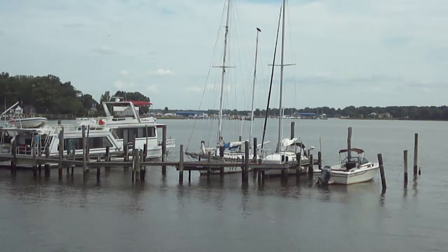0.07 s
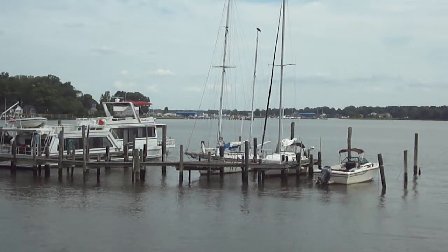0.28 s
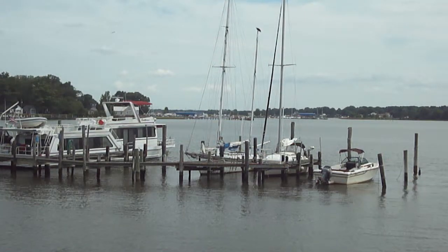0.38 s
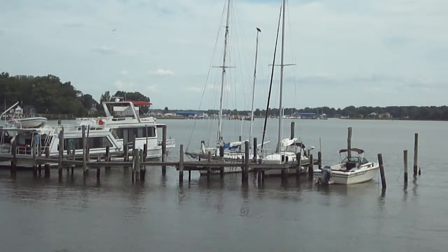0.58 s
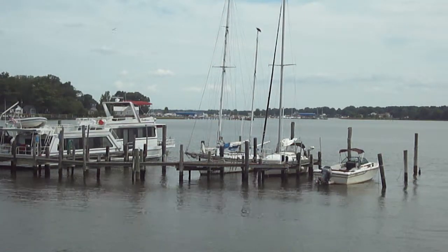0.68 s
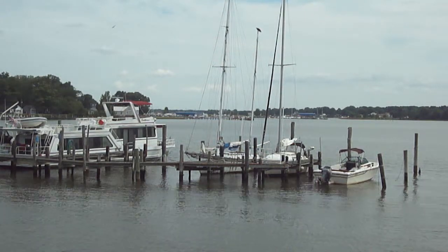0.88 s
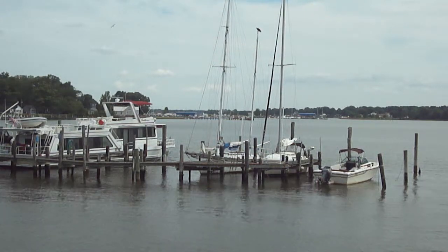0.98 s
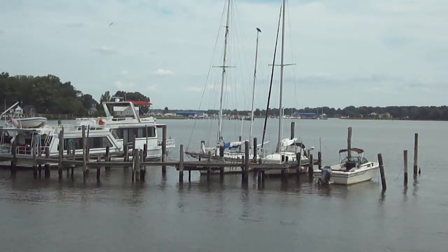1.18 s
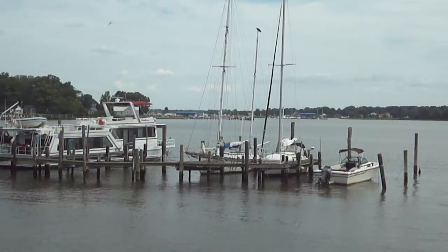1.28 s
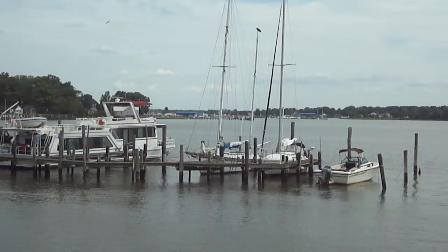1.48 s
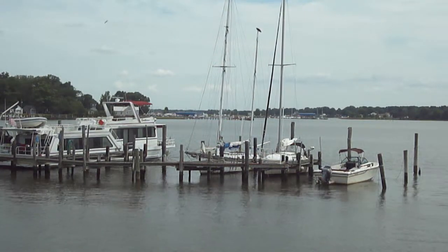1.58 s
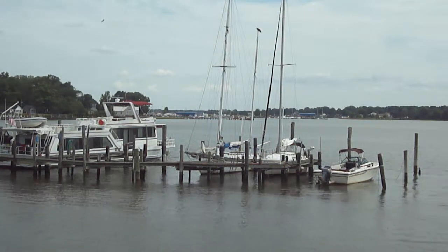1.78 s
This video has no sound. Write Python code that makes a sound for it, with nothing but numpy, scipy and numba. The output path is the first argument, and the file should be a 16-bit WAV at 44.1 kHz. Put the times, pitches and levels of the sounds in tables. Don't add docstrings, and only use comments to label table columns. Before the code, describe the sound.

Small wave at a dock piling: a sharp slap at 0.42 s, plopping, ringing bubbles and wash swelling to about 0.93, then draining to thin fizz by 1.3. A bird whistles a stepped fall at 0.2 and a higher, louder smooth fall at 1.1, echoing lightly. Cicadas buzz in quickening pulses at 0-0.5 and 1.2-1.65; faint distant birds call around 0.5 and 1.35-1.7; a mast ticks at 1.82. Quiet harbour air, thin mono microphone.

```python
import sys
import numpy as np
from scipy import signal
from scipy.io import wavfile
from scipy.ndimage import uniform_filter1d
from numba import njit

SR = 44100
rng = np.random.default_rng(int(sys.argv[2]) if len(sys.argv) > 2 else 0)


def digitize_waveform(pressure):
    field = np.atleast_2d(pressure).T
    bounded = np.clip(field, -1, 1)
    quanta = np.round(bounded * 32767).astype(np.int16)
    wavfile.write(sys.argv[1], SR, quanta)


def gain_from_db(level_db):
    decades = np.asarray(level_db, float) / 20
    return 10 ** decades


N = 81585
T = np.arange(N) / SR
BOUNCE_LAG = int(SR / 206.2)


def curve(rows, col):
    rows = np.array(rows)
    return np.interp(T, rows[:, 0], rows[:, col])


def unit(x):
    return x / np.sqrt(np.mean(x ** 2))


def tint(points, hz):
    f, db = np.array(points).T
    return np.interp(np.log(hz), np.log(f), db)


def band(x, hz, width):
    b, a = signal.iirpeak(min(hz, .45 * SR), hz / width, fs=SR)
    return signal.lfilter(b, a, signal.lfilter(b, a, x))


def highpass(x, order, hz):
    return signal.sosfilt(signal.butter(order, hz, "high", fs=SR, output="sos"), x)


def walk(rate):
    hold = int(SR / rate)
    steps = np.repeat(rng.standard_normal(N // hold + 1), hold)
    return 1.3 * uniform_filter1d(uniform_filter1d(steps, hold), hold)[:N]


def bands(points, flicker_db):
    swell = 0.5 * walk(8.35)
    total = 0
    for hz in 60 * 2 ** (np.arange(23) / 3):
        level = tint(points, hz) + 10 * np.log10(hz) + swell + flicker_db * walk(18.28)
        total = total + gain_from_db(level) * unit(band(rng.standard_normal(N), hz, hz / 2))
    return unit(total)


@njit
def ring(n, start, step, cycles, size, glide, rise):
    y = np.zeros(n)
    for k in range(len(start)):
        span = cycles[k] * 2 * np.pi / step[k]
        for i in range(min(int(span * 2), n - start[k])):
            u = i / span
            envelope = (1 - np.exp(-rise * u)) * np.exp(-3 * u)
            y[start[k] + i] += size[k] * envelope * np.sin(step[k] * i * (1 + glide * u / 2))
    return y


def bubbles(s, hz, size, cycles, glide, rise):
    return ring(N, (s * SR).astype(np.int64), 2 * np.pi * hz / SR, 1. * cycles, 1. * size, glide, rise)


# t/s, level/dB, spray/dB (gain of the top end)
WAVE_SURGE = [(0, -51, 4.5), (.3, -54.5, 15), (.4, -46, 5), (.45, -41.5, 6.5), (.55, -39.5, 1.5),
              (.6, -36, -4), (.68, -37, 0.5), (.8, -33.5, -0.5), (.93, -31, -5), (1.04, -33.5, -3),
              (1.15, -39, 2.5), (1.25, -45.5, 6), (1.4, -46, 8.5), (1.55, -46.5, 11), (1.7, -45.5, 4),
              (1.85, -47.5, -6)]
# f/Hz, level/dB per Hz
WATER_SPECTRUM = [(35, -81), (100, -62), (207, -11.5), (400, -9.5), (650, -2), (1300, -1), (4200, -4.5),
                  (10800, -22.5)]


def wash_and_fizz():
    when, pitch, luck, length = rng.random((6000, 4)).T
    hz = 400 * 2 ** (4.2 * pitch)
    scatter_db = 2 * np.minimum(-np.log(1 - luck), 4)
    size = gain_from_db(tint(WATER_SPECTRUM, hz) + 10 * np.log10(hz) + scatter_db)
    fizz = unit(bubbles(when * T[-1], hz, size, 5.68 * (.5 + length), glide=0.22, rise=15.8))
    water = gain_from_db(-0.5) * bands(WATER_SPECTRUM, flicker_db=0) + gain_from_db(-1) * fizz
    spray_hz = 3500
    low = signal.sosfiltfilt(signal.butter(1, spray_hz, fs=SR, output="sos"), water)
    spray = gain_from_db(curve(WAVE_SURGE, 2)) * (water - low)
    return gain_from_db(curve(WAVE_SURGE, 1)) * (low + spray)


def slap():
    slap_s, slap_hz, slap_db, bounce_db = .4227, 1000, -13, -10.5
    u = (T - slap_s) * slap_hz * 4
    hit = band(-gain_from_db(slap_db) * 2 * u * np.exp(-u ** 2), slap_hz, 1330)
    return hit + gain_from_db(bounce_db) * np.roll(hit, BOUNCE_LAG)


# t/s, f/Hz, peak level/dB, decay/cycles
GURGLES = [(.382, 1550, -30.5, 2.8), (.4128, 5730, -21, 8), (.4135, 2010, -34, 6), (.4155, 4120, -26.5, 12),
           (.4235, 720, -45, 4.7), (.43, 1140, -27, 7.4), (.492, 2830, -21.5, 12), (.499, 2770, -26, 7),
           (.481, 1980, -39, 4.6), (.505, 1030, -35, 10), (.493, 400, -33.5, 3.1), (.517, 1146, -27, 12.7),
           (.557, 2700, -29.5, 26), (.56, 705, -27.5, 5), (.563, 730, -24.5, 12), (.566, 1190, -24, 9),
           (.593, 1170, -25.5, 4), (.597, 586, -28.5, 4.3), (.604, 678, -29.5, 8.2), (.626, 1010, -27, 4.1),
           (.613, 603, -29, 7.9), (.643, 450, -30, 2.2), (.667, 510, -32, 3), (.640, 1370, -30, 11),
           (.654, 639, -34, 16), (.709, 2550, -30.5, 29), (.800, 855, -51, 4.1), (.879, 820, -28, 18),
           (.922, 598, -22.5, 7.9), (.940, 393, -35, 3.3), (.972, 686, -33, 5.5), (1.004, 1310, -24.5, 8.3),
           (1.065, 1180, -26.5, 9.3), (1.081, 826, -31, 9.2), (1.145, 1170, -27, 7.6),
           (1.281, 740, -41, 3.1), (1.454, 1120, -34, 9.4), (1.63, 200.6, -54, 16), (1.752, 296, -44, 5.2)]


def gurgle():
    s, hz, db, cycles = np.array(GURGLES).T
    return 3.01 * bubbles(s, hz, gain_from_db(db), cycles, glide=0.048, rise=3.67)


# t/s, level/dB, centre f/Hz, length/s
SPLASH_BURSTS = [(0.378, -39, 1960, 0.0018), (.4128, -35.5, 5840, .002), (0.4143, -29, 2040, 0.0022),
                 (0.42, -29, 4500, 0.002), (0.418, -44, 7750, 0.015), (0.487, -35, 5300, 0.0022),
                 (.492, -30, 2900, 0.0027), (0.502, -35, 8500, 0.0011), (.531, -45, 8000, .003),
                 (0.561, -32, 3100, 0.0024), (0.614, -42, 9500, 0.0035), (.659, -40, 9800, 0.0027),
                 (0.673, -39.5, 8100, 0.0034), (0.794, -41, 9000, 0.0027), (0.921, -40, 9000, .004),
                 (1.108, -39.5, 7500, 0.0017), (1.132, -54, 9500, .002), (1.31, -47, 9400, .002),
                 (1.068, -39, 7300, 0.0023)]


def splashes():
    out = np.zeros(N)
    for s, db, hz, length in SPLASH_BURSTS:
        u = np.clip((T - s) / length, 0, 40)
        burst = np.e * u * np.exp(-u * 2) * 2
        out += gain_from_db(db) * burst * unit(band(rng.standard_normal(N), hz, hz))
    return out


def wave():
    return highpass(wash_and_fizz() + slap() + gurgle() + splashes(), 3, 178)


# t/s, f/Hz, level/dB
BIRD_NOTES = [
    [(.19, 2505, -55), (.2, 2505, -29), (.215, 2450, -24.5), (.229, 2375, -21.5), (.243, 2246, -27.5),
     (.259, 2177, -22), (.275, 2136, -33), (.295, 1963, -42), (.31, 1920, -56)],
    [(1.073, 4143, -49), (1.086, 3500, -30), (1.1, 3187, -22), (1.117, 2853, -19.5), (1.135, 2623, -17),
     (1.152, 2459, -17), (1.177, 2280, -24.5), (1.192, 2175, -29), (1.212, 2030, -48)],
]
BIRD_OVERTONES = (-21, -15.5)
# delay/s, level/dB, spread/s
HULL_ECHOES = [
    (.03, -16.5, .018),
    (.075, -20, .016),
    (.12, -22.5, .016),
    (.16, -27, .02),
    (.25, -25, .04),
]


def bird():
    voice, overtone = 0, 0
    for note, overtone_db in zip(BIRD_NOTES, BIRD_OVERTONES):
        glide = uniform_filter1d(curve(note, 1), size=400)
        hz = np.roll(glide, -BOUNCE_LAG // 2) * (1 + 0.0011 * walk(120))
        phase = 2 * np.pi * np.cumsum(hz) / SR
        sounding = (T > note[0][0]) * (T < note[-1][0])
        level = gain_from_db(uniform_filter1d(curve(note, 2), size=200)) * sounding
        voice = voice + level * np.sin(phase)
        effort = (level / gain_from_db(-40)) ** .25
        overtone = overtone + gain_from_db(overtone_db) * level * effort * np.sin(2 * phase)
    overtone = band(overtone, 4600, 3000)

    harbour_t60_s, harbour_db = 1, -16.5
    tail = rng.standard_normal(N) * 10 ** (-3 * T / harbour_t60_s) * (T > .012)
    space = gain_from_db(harbour_db) * tail / np.sqrt(SR * 0.031)
    for s, db, spread in HULL_ECHOES:
        echo = rng.standard_normal(N) * np.exp(-((T - s) / spread) ** 2)
        space += gain_from_db(db) * echo / np.sqrt(SR * spread)

    bounce = np.roll(gain_from_db(-0.5) * voice + gain_from_db(-9.5) * overtone, BOUNCE_LAG)
    direct = voice + overtone
    return direct + bounce + signal.fftconvolve(direct, space)[:N]


# f/Hz, width/Hz, level/dB
TYMBAL_MODES = [(3735, 410, -3), (4275, 630, 1.5), (5170, 1390, -2), (5850, 830, -3.5), (6780, 650, -11),
                (8100, 1850, -20.5)]


def tymbal(drive):
    out = 0
    for i, (hz, width, db) in enumerate(TYMBAL_MODES):
        out = out + (-1) ** i * gain_from_db(db) * band(drive, hz, width)
    return out


# pulse number, t/s
BUZZ_PHRASES = [
    [(0, .0142), (9, .192), (16, .326), (21, .412), (28, .525)],
    [(0, 1.2118), (7, 1.3613), (9, 1.4012), (14, 1.4925), (20, 1.5888), (24, 1.6502)],
]
# t/s, buzz level/dB, chorus level/dB
CICADA_EFFORT = [(0, -39, -49), (.15, -34.5, -46), (.25, -34, -44), (.4, -35, -48), (.53, -38, -47),
                 (.8, -38, -48), (1.2, -37, -48), (1.3, -34, -47), (1.38, -33, -43), (1.47, -32.5, -44),
                 (1.55, -32.5, -46), (1.655, -32.5, -47), (1.85, -41, -53)]


def cicadas():
    gate = np.zeros(N)
    for phrase in BUZZ_PHRASES:
        times = np.interp(np.arange(phrase[-1][0] + 1), *np.array(phrase).T)
        for t0 in times:
            u = np.clip((T - t0) / .0018, 0, 50)
            gate += gain_from_db(.6 * rng.standard_normal()) * u * np.exp(1 - u)
    rib_hz = 2600
    gaps = SR / rib_hz * (1 + .3 * rng.uniform(-1.2, 1, 4000))
    ribs = np.cumsum(gaps).astype(int)
    rattle = np.zeros(N)
    rattle[ribs[ribs < N]] = np.sqrt(SR / rib_hz)
    throb_hz = 116 * (1 + 0.025 * walk(4.8))
    throb = 1 + 0.22 * np.sin(2 * np.pi * np.cumsum(throb_hz) / SR)
    buzz = gain_from_db(curve(CICADA_EFFORT, 1)) * gate * rattle
    chorus = gain_from_db(curve(CICADA_EFFORT, 2)) * throb * rng.standard_normal(N)
    return tymbal(buzz + chorus) / np.std(tymbal(rattle))


# f/Hz, level/dB, t60/s
MAST_MODES = [
    (4970, -39.5, 0.18),
    (8400, -47, 0.055),
    (3500, -41, 0.048),
]


def halyard():
    u = np.clip(T - 1.823, 0, None)
    out = np.zeros(N)
    for hz, db, t60 in MAST_MODES:
        envelope = (1 - np.exp(-u / 0.0012)) * 10 ** (-3 * u / t60)
        out += gain_from_db(db) * envelope * np.sin(2 * np.pi * hz * u)
    return out


# t/s, length/s, f/Hz, fall/Hz per s, level/dB
FAR_CALLS = [
    (.55, .1, 1820, 0, -43),
    (.465, .05, 1850, 0, -44),
    (1.362, .045, 1880, 600, -39),
    (1.4, .16, 1830, 57, -42),
    (1.35, .045, 2830, 0, -39),
    (1.41, .1, 2830, 0, -45),
    (1.58, .085, 2760, 4000, -48),
    (1.69, .05, 2500, -6000, -51),
    (1.35, .33, 360, 0, -55),
]


def far_bird():
    out = np.zeros(N)
    for s, length, hz, fall, db in FAR_CALLS:
        level = gain_from_db(db + 3.2 * walk(59.85))
        envelope = np.sin(np.pi * np.clip((T - s) / length, 0, 1) ** 0.65)
        pitch = (hz - fall * (T - s)) * (1 + .007 * walk(70))
        out += level * envelope * np.sin(2 * np.pi * np.cumsum(pitch) / SR)
    return out


# f/Hz, level/dB per Hz
AIR_SPECTRUM = [(35, -33), (70, -17), (200, -10), (500, -1.5), (1200, -7.5), (3000, -20.5), (6000, -10),
                (10800, -31)]


def air():
    return gain_from_db(-50) * bands(AIR_SPECTRUM, flicker_db=3.1)


def scene():
    return (wave() + bird() + cicadas() + halyard() + far_bird() + air())[None]


def low_pass(x):
    return signal.sosfilt(signal.butter(12, 10910, fs=SR, output="sos"), x)


def record(dry):
    x = highpass(dry, 2, 89)
    x = highpass(x + 0.36 * x ** 4, 1, 20)
    x = signal.sosfilt(signal.ellip(10, .2, 80, 10950, fs=SR, output="sos"), x)
    return low_pass(x)


dry = scene()
out = record(dry)
digitize_waveform(out)
```